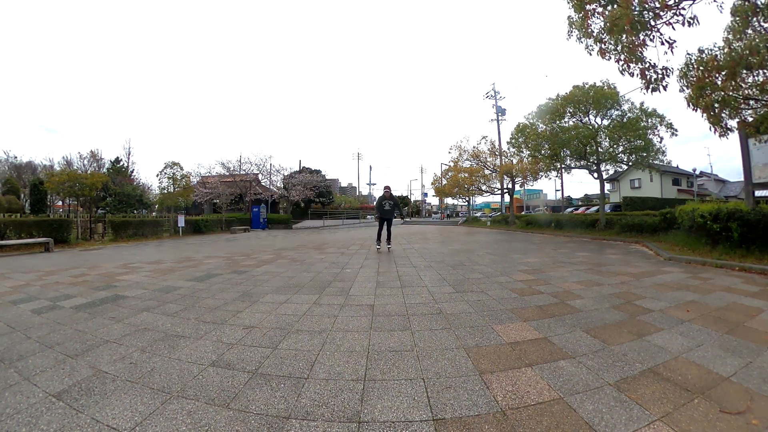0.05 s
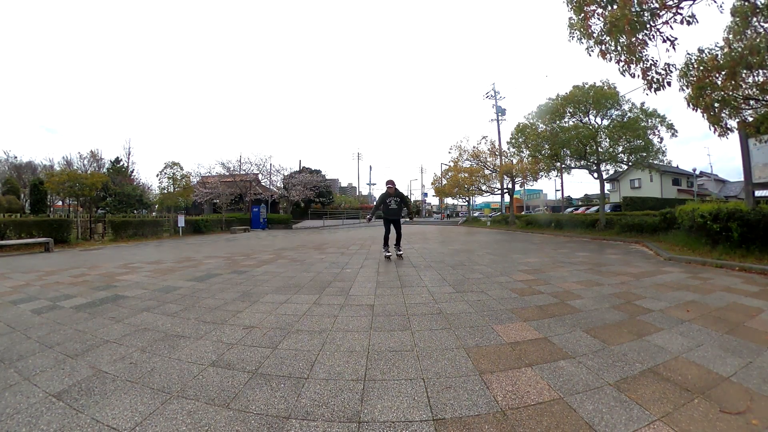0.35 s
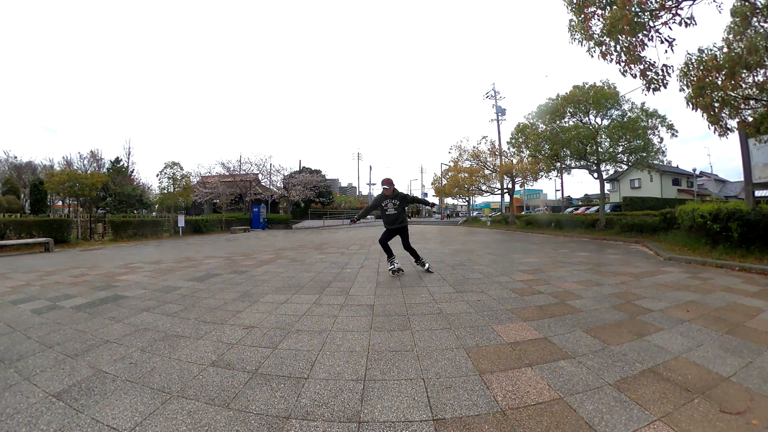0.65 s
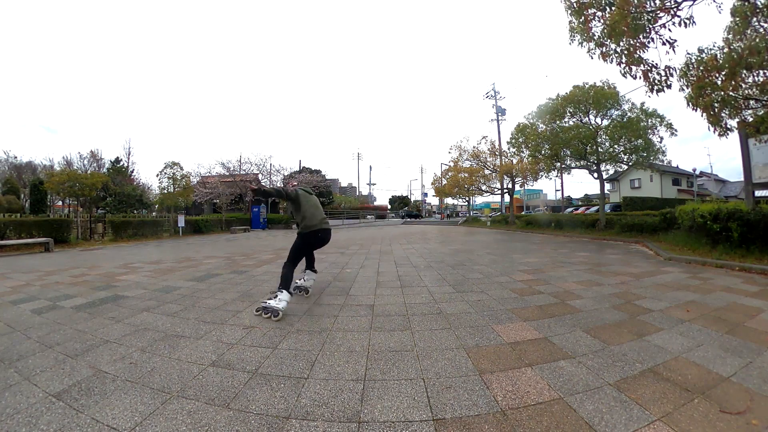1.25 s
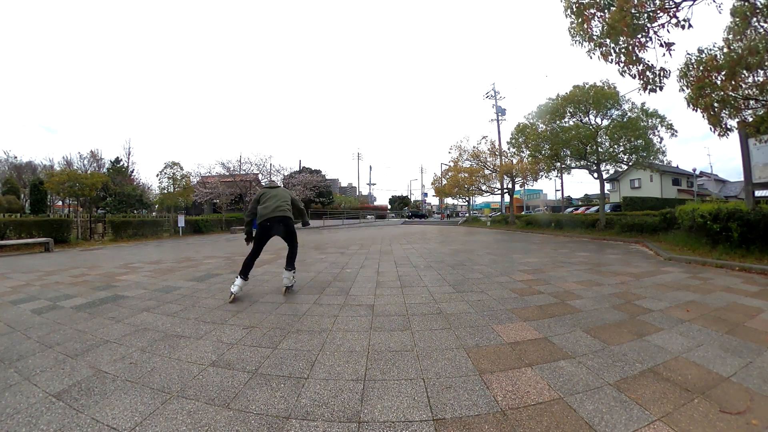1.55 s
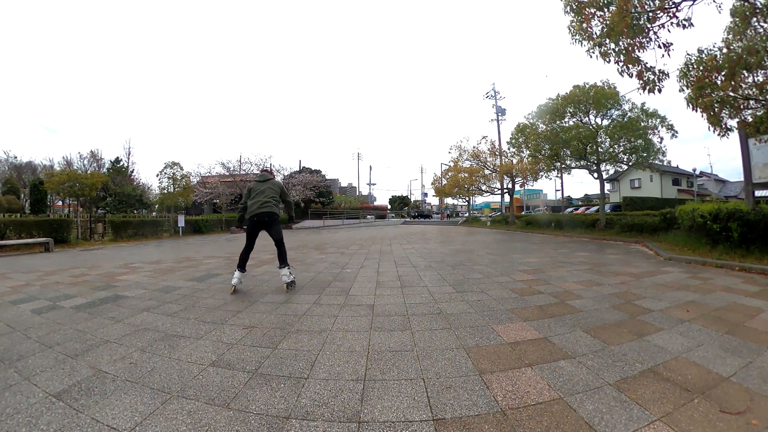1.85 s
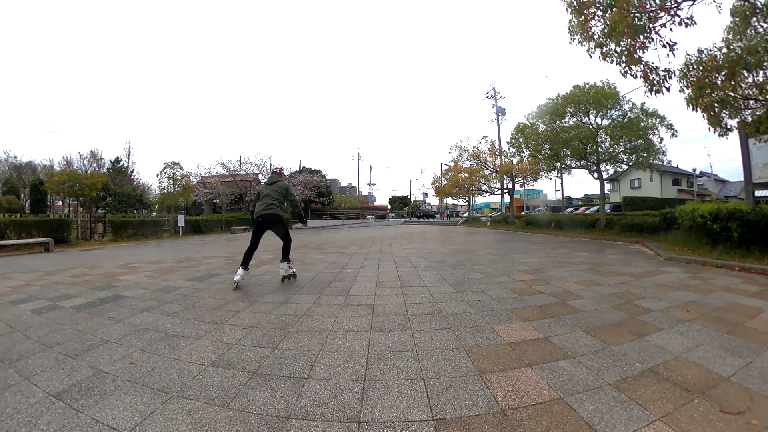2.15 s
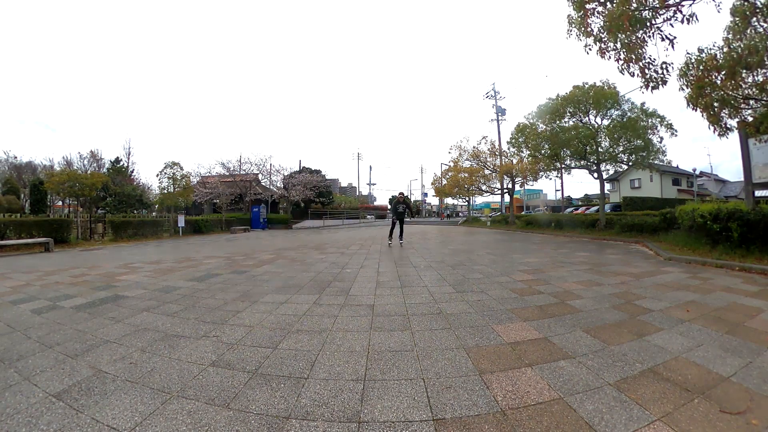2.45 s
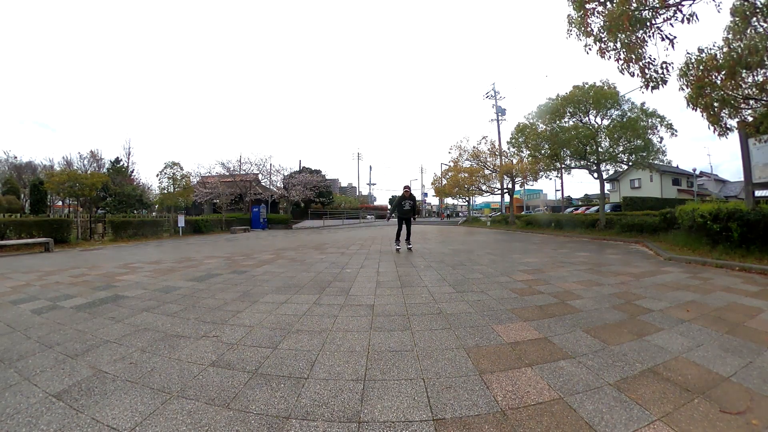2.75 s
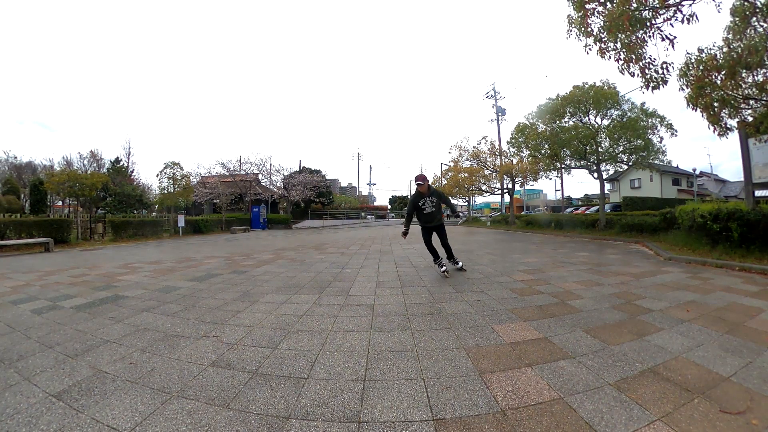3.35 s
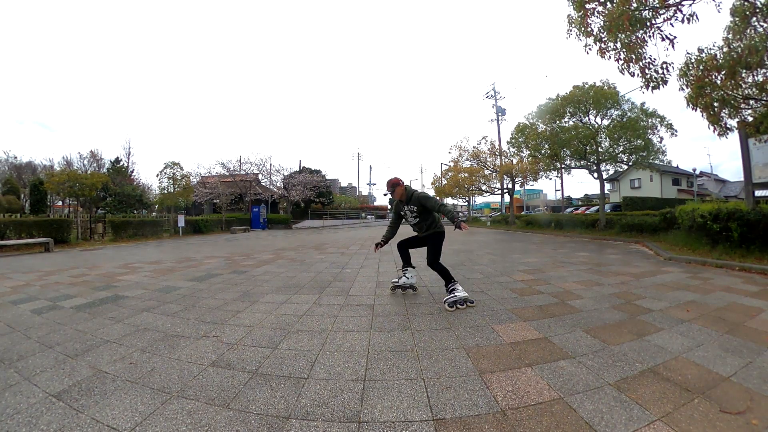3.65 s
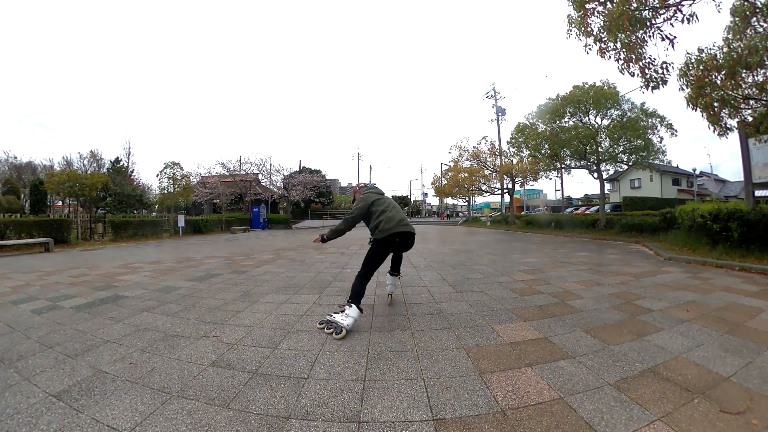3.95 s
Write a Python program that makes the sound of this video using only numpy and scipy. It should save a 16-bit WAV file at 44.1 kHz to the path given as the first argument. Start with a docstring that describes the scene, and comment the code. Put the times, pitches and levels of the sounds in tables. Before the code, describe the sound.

An inline skater rumbles and clacks across paving slabs, carving close to the microphone two times.

```python
"""Inline skater on stone paving

A skater rolls up, carves close by and coasts away in mono; a second approach starts abruptly in stereo.
The wheels rumble, whirr and knock over slab joints; in the carves they scrub over grit and ring.
Wind buffets the microphone, and birds call in the park over distant traffic."""
import sys
import numpy as np
from scipy import signal
from scipy.fft import rfft, irfft, next_fast_len
from scipy.io import wavfile
from scipy.ndimage import map_coordinates

SR = 44100
rng = np.random.default_rng(int(sys.argv[2]) if len(sys.argv) > 2 else 0)


def master_out(mix):
    """Clip the mix to full scale and print it as 16-bit PCM to the path in sys.argv[1]."""
    frames = np.transpose(np.atleast_2d(mix))
    ceiling = np.clip(frames, -1, 1)
    pcm = np.round(ceiling * 32767).astype(np.int16)
    wavfile.write(sys.argv[1], SR, pcm)


N = 176400
TIME = np.arange(N) / SR
IN_SECOND_PASS = TIME >= 2.386
PITCH_WAVER = 0.02  # share by which whirr and ring wander


# Fader rides for each pass (time [s], rumble [dB], whirr [dB], scrub [dB])
FIRST_RIDE = [(0, -48, -59.5, -71), (.5, -47, -53.5, -74.5), (.73, -37.5, -50, -52.5),
              (.8, -38.5, -65, -60), (.88, -39, -55, -57.5), (.93, -31.5, -47, -47.5),
              (1.02, -37, -59, -42), (1.19, -37, -63, -52), (1.37, -40.5, -58.5, -52.5),
              (1.5, -44.5, -55, -59.5), (1.66, -54.5, -73, -81), (2.38, -57.5, -75, -84)]
SECOND_RIDE = [(2.39, -39.5, -45.5, -52.5), (2.66, -46.5, -49.5, -63.5), (2.8, -40, -46, -59),
               (3.05, -45.5, -49.5, -63), (3.33, -40.5, -45.5, -61), (3.46, -37, -37.5, -48.5),
               (3.54, -28, -40, -39), (3.64, -30, -42, -42), (3.76, -25, -52, -33.5), (3.93, -28, -72, -33),
               (4, -32, -43, -37)]

def rolling():
    """Rough paving shakes the skates; its unevenness jolts rumble, whirr and scrub together."""
    rumble_db, whirr_db, scrub_db = np.where(IN_SECOND_PASS, curves(SECOND_RIDE), curves(FIRST_RIDE))
    bumps_db = 1.68 * wobble(70.9)
    return rumble(rumble_db, bumps_db) + whirr(whirr_db, bumps_db) + scrub(scrub_db, bumps_db) + carves()


# Rumble tone, far off and close up (frequency [Hz], level [dB])
FAR_EQ = [(60, -9.5), (130, 1), (225, -2), (330, -9), (800, -16.5), (1500, -19.5), (3000, -37.5),
          (8000, -92)]
NEAR_EQ = [(60, -11), (120, -1.5), (170, 3), (320, -2), (480, -6), (700, -14), (900, -11), (1600, -19.5),
           (3000, -32.5), (8000, -59)]

def rumble(level_db, bumps_db):
    """The low body of the roll; the fuller, near colour takes over above -37.5 dB."""
    near = (1 + np.tanh((level_db + 37.5) / 0.5)) / 2
    body = np.sqrt(near) * coloured(grit(), NEAR_EQ) + np.sqrt(1 - near) * coloured(grit(), FAR_EQ)
    return amp(level_db + bumps_db) * body


# Midrange wheel resonances (centre [Hz], width [Hz], level [dB])
WHIRR_PEAKS = [(1236, 220, 5.5), (2110, 376, -6)]

def whirr(level_db, bumps_db):
    """The stone's grain excites the wheels, which waver in pitch."""
    tone = bend(resonate(grit(), WHIRR_PEAKS), 1 + PITCH_WAVER * wobble(14))
    return amp(level_db + bumps_db / 2) * tone


# Bright scrub tone (frequency [Hz], level [dB])
SCRUB_EQ = [(300, -5), (900, -9), (3200, 3), (5700, -7.5), (7700, -17.5), (10500, -21.5), (13000, -21.5),
            (15500, -36)]

def scrub(level_db, bumps_db):
    """Wheels scrape over grit; faint, far scrub loses its top."""
    bright = amp(level_db + 0.49 * bumps_db + 0.79 * wobble(400)) * coloured(grit(), SCRUB_EQ)
    dull = filtered(bright, lambda hz: 1 / (1 + (hz / 7500) ** 8))
    far = 1 / (1 + amp(level_db + 58))  # half dull at -58 dB
    return (1 - far) * bright + far * dull


# Swell of each carve (peak time [s], rise [s], fall [s], level [dB])
CARVE_SWELLS = [(1.05, 0.08, 0.23, -43.5), (3.899, 0.091, 0.094, -33.5)]
# High wheel resonances (centre at the glide's midpoint [Hz], width [Hz], level [dB])
RING_PEAKS = [(3145, 330, 3), (4300, 920, -6.5)]

def carves(chatter_hz=151.4, glide_s=0.08):
    """Wheels slipping sideways ring and chatter, falling in pitch as the skater passes."""
    out = np.zeros(N)
    for s, rise, fall, db in CARVE_SWELLS:
        swell = np.exp(-((TIME - s) / np.where(TIME < s, rise, fall)) ** 2)
        gain = amp(db + wobble(chatter_hz)) * swell
        glide = 1 - 0.1 * np.tanh((TIME - s) / glide_s + 1)
        out += gain * bend(resonate(grit(), RING_PEAKS), glide + PITCH_WAVER * wobble(chatter_hz))
    return out


# Hits on slab joints (time [s], thump [dB], click [dB])
JOINT_HITS = [(.893, -27, -29), (1.005, -23, -21.5), (1.119, -17.5, -23), (1.207, -21.5, -35.5),
              (2.239, -37.5, -38), (3.527, -24, -17), (3.544, -29, -12.5), (3.734, -10.5, -15),
              (3.798, -16.5, -20), (3.919, -20, -17.5), (3.95, -13.5, -26)]
# Body of the boot's thump (frequency [Hz], level [dB], 60 dB decay [s])
BOOT_MODES = [(202, 5, 0.026), (314.5, 6.5, 0.029), (495, -2.5, 0.037), (873, -0.5, 0.0096)]
# Click tone (frequency [Hz], level [dB])
CLICK_EQ = [(200, 6), (700, 8), (2800, -3), (6000, -22.5), (15000, -52)]

def joints(attack_s=0.00076):
    """Each slab joint thumps the boot through the soft wheel and clicks."""
    thumps, t = np.zeros(N + SR), np.arange(SR // 8) / SR
    for s, db, _ in JOINT_HITS:
        detunes = np.exp(0.092 * rng.standard_normal(len(BOOT_MODES)))
        thump = sum(amp(level - 60 * t / t60) * np.sin(2 * np.pi * hz * detune * t)
                    for (hz, level, t60), detune in zip(BOOT_MODES, detunes))
        thump *= 1 - np.exp(-t / attack_s)
        thumps[round(s * SR):][:len(t)] += amp(db) * thump / np.abs(thump).max()
    return thumps[:N] + bursts([(s, db) for s, _, db in JOINT_HITS], CLICK_EQ, t60=0.032)


# Grit cracks (time [s], level [dB])
CRACK_HITS = [(1.381, -27.5), (2.76, -46), (2.942, -41.5), (3.288, -34), (3.528, -28), (3.7, -23.5)]
# Their crisp tone (frequency [Hz], level [dB])
CRACK_EQ = [(4000, 3), (12000, -13.5), (16000, -28)]

def cracks():
    """Grit cracks under a wheel with a dry tick."""
    return bursts(CRACK_HITS, CRACK_EQ, t60=0.013)


# Low skate resonance (centre [Hz], width [Hz], level [dB])
DRONE_PEAK = [(218, 35, 0)]

def drone(half_gain_s=0.42, fade_s=0.42):
    """The skates hum on the first straight run, fading as the carve begins."""
    fade = (1 - np.tanh((TIME - half_gain_s) / fade_s)) / 2
    return amp(-44.5) * fade * resonate(grit(), DRONE_PEAK)


# Gust ride (time [s], level [dB])
GUST_RIDE = [(0, -43.5), (1, -47), (1.28, -38.5), (2.05, -47), (2.37, -43), (2.41, -36), (2.8, -40.5),
             (2.85, -21.5), (3.0, -28.5), (3.3, -25.5), (3.5, -45.5), (4, -40)]
# Bass-heavy buffet tone (frequency [Hz], level [dB])
BUFFET_EQ = [(14, -42), (29, -1.5), (44, 0.5), (110, -10.5), (300, -47), (800, -110.5)]

def wind():
    """Lumpy low buffeting on the microphone."""
    level_db, = curves(GUST_RIDE)
    return amp(level_db + 1.34 * wobble(28)) * coloured(noise(), BUFFET_EQ)


# Distant calls (time [s], length [s], start pitch [Hz], end pitch [Hz], level [dB])
BIRD_NOTES = [(0.591, 0.04, 5950, 5170, -64), (1.912, 0.057, 5820, 5080, -68),
              (1.944, 0.087, 4360, 4230, -63.5), (2.388, 0.096, 4730, 4450, -58),
              (2.481, .11, 6930, 6200, -67)]

def birds(echo_t60=0.59, wet=0.7):
    """Hoarse gliding notes, smeared by the trees and houses."""
    calls = np.zeros(N)
    rasp = unit(wobble(1100) + 0.71 * wobble(2680))  # widens each note and adds a broad skirt
    for s, length, start_hz, end_hz, db in BIRD_NOTES:
        progress = np.clip((TIME - s) / length, 0, 1)
        phase = 2 * np.pi * np.cumsum(start_hz + (end_hz - start_hz) * progress) / SR
        calls += amp(db) * np.sqrt(8 * progress * (1 - progress)) * rasp * np.sin(phase)
    tail = (noise() * amp(-60 * TIME / echo_t60))[:SR]
    return calls + wet * signal.fftconvolve(calls, tail / np.linalg.norm(tail))[:N]


# Dark ambience bed (frequency [Hz], level [dB])
TRAFFIC_EQ = [(30, -14), (170, -1.5), (350, -16.5), (1400, -31), (5500, -40), (15000, -66.5)]

def traffic():
    """Distant traffic fills the park with a steady wash."""
    return amp(-52) * coloured(noise(), TRAFFIC_EQ)


def grit(grains_per_s=900, power_share=0.35, spread_db=2.5):
    """Tiny impacts of the stone's grain over a bed of noise."""
    grains = (rng.random(N) < grains_per_s / SR) * noise() * amp(spread_db * noise())
    return np.sqrt(power_share) * unit(grains) + np.sqrt(1 - power_share) * noise()


def bursts(hits, spectrum, t60, attack_s=0.0003):
    """Short dying puffs of coloured noise, one per hit."""
    envelope = np.zeros(N)
    for s, db in hits:
        age = np.maximum(TIME - s, 0)
        envelope += amp(db - 60 * age / t60) * np.tanh(age / attack_s) ** 2
    return envelope * coloured(noise(), spectrum) / 2


def amp(db):
    """Decibels to gain."""
    return 10 ** (np.asarray(db) / 20)


def unit(x):
    """Scale to rms 1."""
    return x / np.sqrt(np.mean(x ** 2) + 1e-20)


def noise():
    """White noise."""
    return rng.standard_normal(N)


def wobble(rate):
    """A smooth random curve, rate knots a second."""
    return map_coordinates(rng.standard_normal(N // 8), [TIME * rate], mode="wrap")


def curves(rows):
    """One value per sample for each column after the time."""
    times, *columns = np.transpose(rows)
    return [np.interp(TIME, times, column) for column in columns]


def along(points, hz, column=1):
    """One column of a table read on a log-frequency axis."""
    columns = np.transpose(points)
    return np.interp(np.log(hz + 1), np.log(columns[0] + 1), columns[column])


def filtered(x, response):
    """x through a complex frequency response."""
    size = next_fast_len(N + SR // 2)
    return irfft(rfft(x, size) * response(np.fft.rfftfreq(size, 1 / SR)), size)[..., :N]


def coloured(x, spectrum):
    """x through an EQ curve, rms 1."""
    return unit(filtered(x, lambda hz: amp(along(spectrum, hz))))


def resonate(x, peaks):
    """x through steep-sided resonances, rms 1."""
    def band(hz, centre, width):
        damping = 1.5j * hz * width
        return (damping / (centre ** 2 - hz ** 2 + damping)) ** 2
    return unit(filtered(x, lambda hz: sum(amp(db) * band(hz, c, w) for c, w, db in peaks)))


def bend(x, speed):
    """x with its pitch bent by a speed ratio."""
    return map_coordinates(x, [np.cumsum(speed)], mode="wrap")


def microphone(x, image):
    """Mono in the first pass; in the second, recoloured and spread by level and phase."""
    def left_over_right(hz):
        return amp(along(image, hz)) * np.exp(1j * along(image, hz, column=2))
    mid = np.where(IN_SECOND_PASS, filtered(x, lambda hz: amp(along(image, hz, column=3))), x)
    side = IN_SECOND_PASS * filtered(mid, lambda hz: (left_over_right(hz) - 1) / (left_over_right(hz) + 1))
    return np.array([mid + side, mid - side])


# Stereo images (frequency [Hz], left minus right [dB], left phase lead [rad], colour [dB])
PARK_IMAGE = [(1020, 3, 0, -0.5), (1520, -6, 1.49, 1.5), (5800, -6, 0.95, 0), (6200, -5.5, 1.24, 4.5),
              (8350, 0, 1.7, -0.5), (8900, 6, -0.83, 4), (11400, -2, 0, -5), (15000, 4, 0, -12.5)]
WIND_IMAGE = [(100, 13, -1.5, 0)]

def scene():
    """Skater, birds and traffic under wind; diffuse wheel treble and gusts widen the second pass."""
    bed = traffic()
    skater = rolling() + drone() + joints() + cracks()
    scattered = filtered(rolling(), lambda hz: amp(-22.5) * hz ** 4 / (hz ** 4 + 2200 ** 4))
    side = IN_SECOND_PASS * (amp(-10) * wind() + scattered)
    park = microphone(skater + birds() + bed, PARK_IMAGE)
    return park + microphone(wind(), WIND_IMAGE) + np.array([side, -side])


def record(dry):
    """A brick-wall high cut trims the very top."""
    return filtered(dry, lambda hz: hz < 15700)


dry = scene()
out = record(dry)
master_out(out)
```